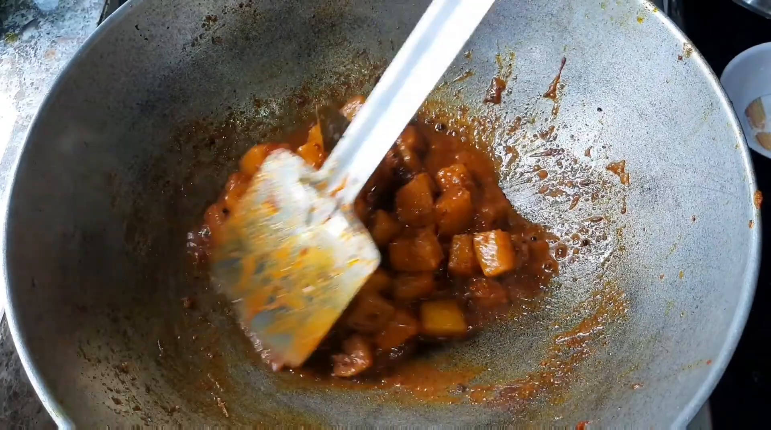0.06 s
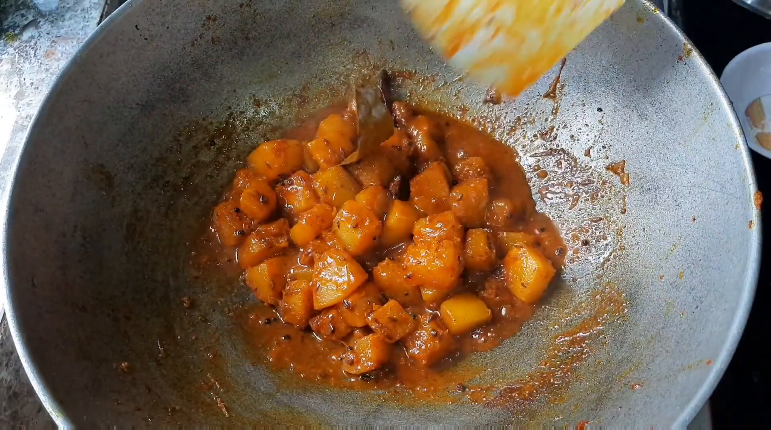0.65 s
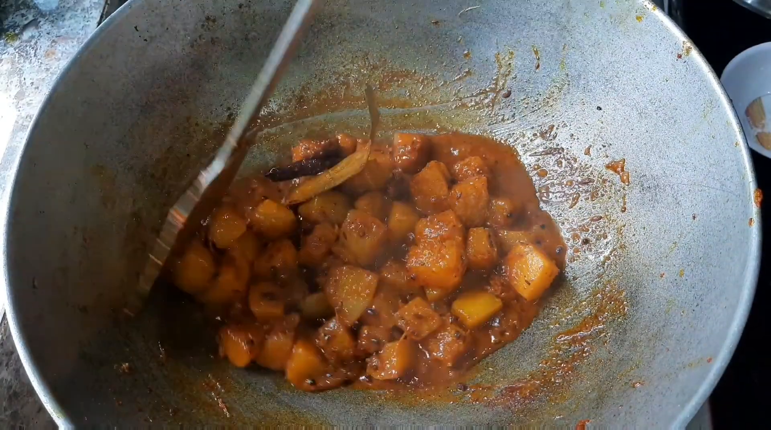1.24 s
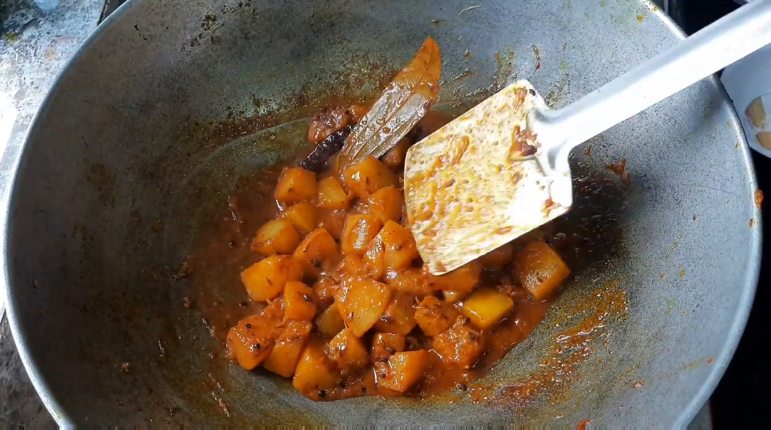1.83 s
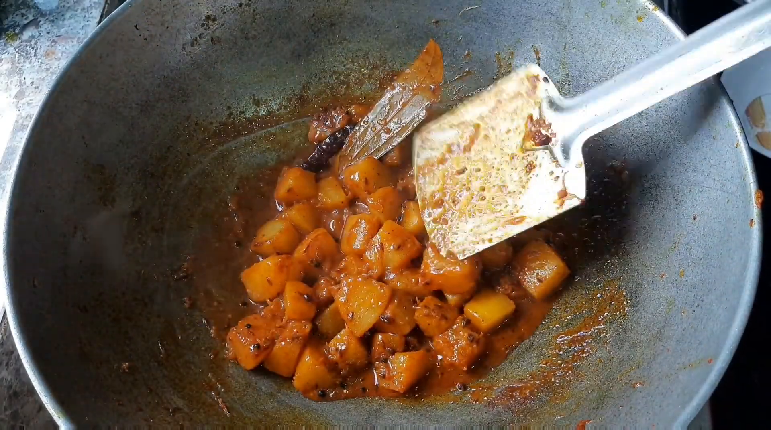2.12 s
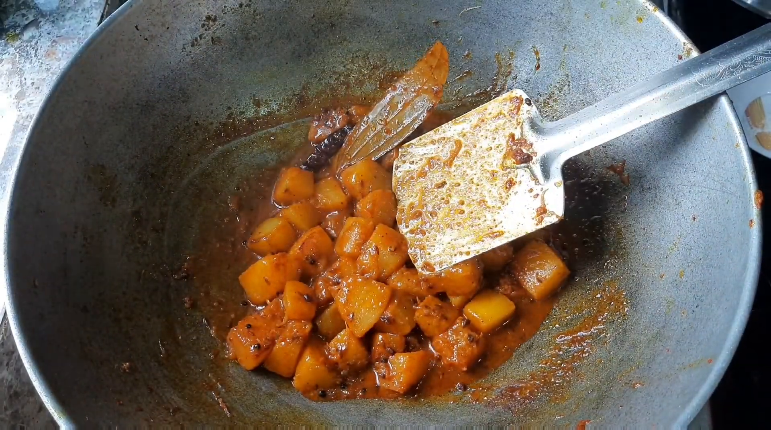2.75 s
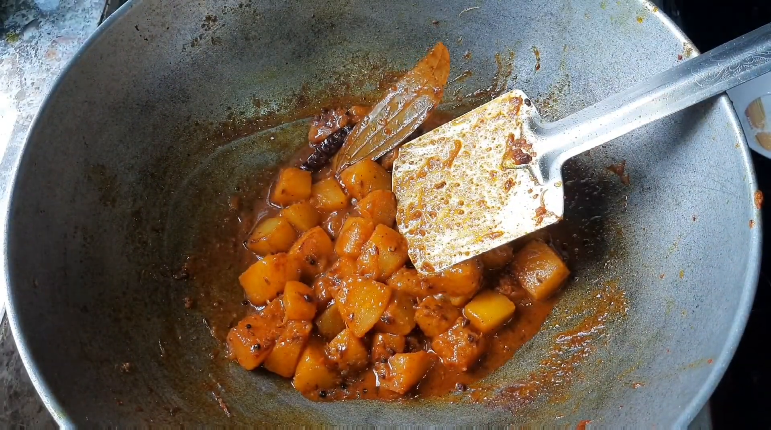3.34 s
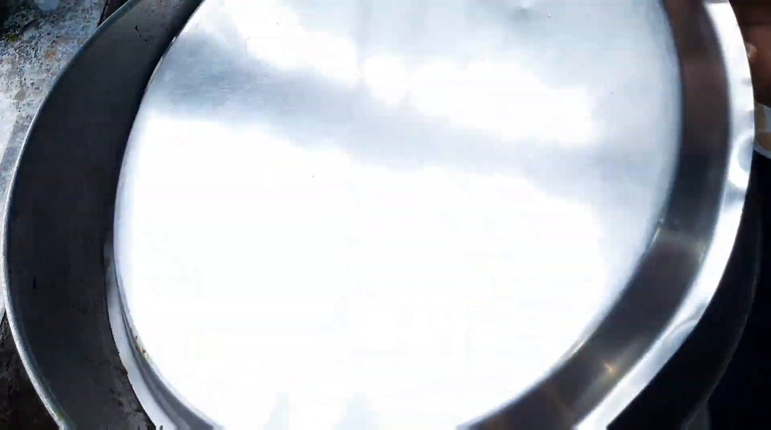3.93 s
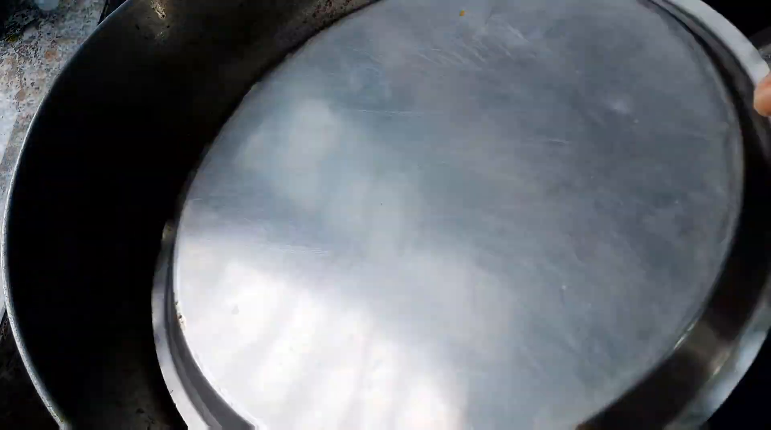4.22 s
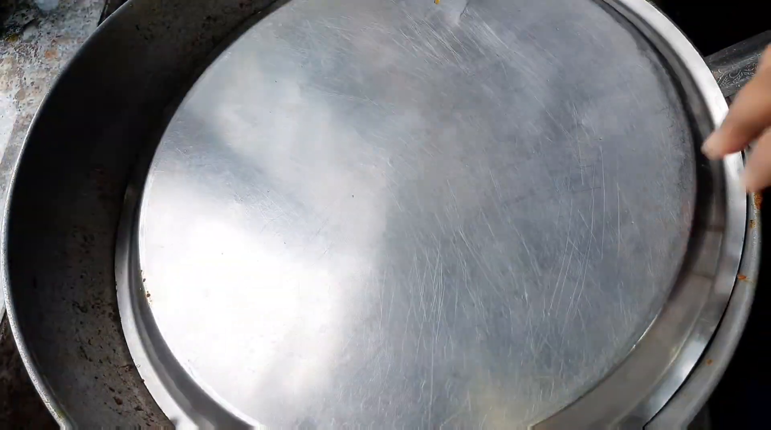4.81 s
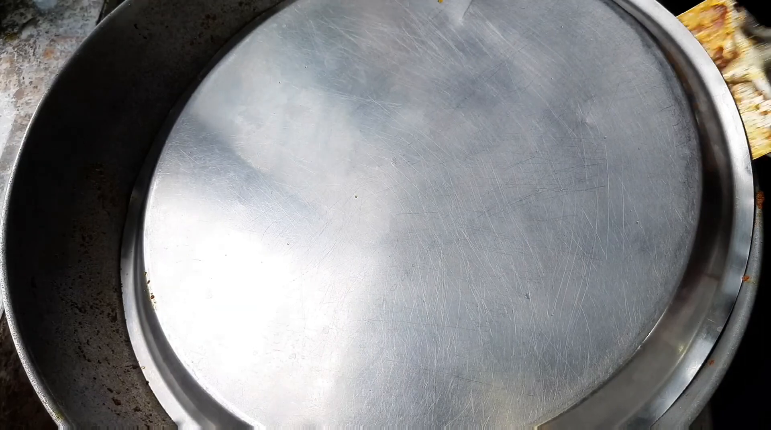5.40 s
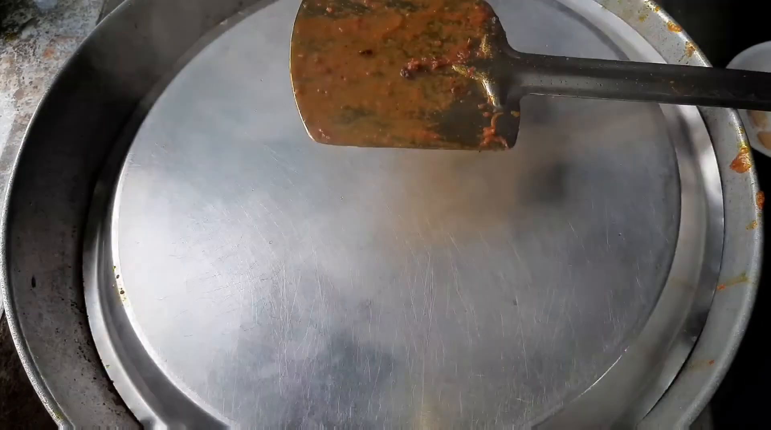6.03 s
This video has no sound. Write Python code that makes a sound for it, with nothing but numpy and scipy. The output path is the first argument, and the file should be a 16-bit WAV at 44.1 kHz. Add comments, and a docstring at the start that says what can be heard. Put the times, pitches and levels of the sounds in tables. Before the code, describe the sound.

Close to a kitchen stove, low gusts of air rumble on the microphone about once a second, over quiet frying and a steel spatula scraping and tapping in a wok. A lid is picked up with light clinks and lands with a ringing metal clatter. At once water flashes to steam, and a loud, high hiss with fine spitting and a faint ring under the lid covers almost everything else.

```python
"""Water from a wet steel lid bursts into a loud hiss on a hot wok, ringing between pan and lid.
The microphone is close to a kitchen stove, and a draught buffets it in slow, even waves.
First, vegetables fry in oil while a steel spatula scrapes, knocks and shoves them through the sauce.
Then the lid is picked up, knocks on the rim and slides into place, and its water runs down the
hot metal and flashes to steam."""
import sys
import numpy as np
from scipy import signal
from scipy.fft import rfft, irfft, next_fast_len
from scipy.io import wavfile
from scipy.ndimage import uniform_filter1d

SR = 44100
rng = np.random.default_rng(int(sys.argv[2]) if len(sys.argv) > 2 else 0)


def file_out(sig):
    """Save sig as 16-bit WAV at sys.argv[1]."""
    # one column per channel
    cols = np.atleast_2d(sig).T
    # limit, then scale
    lim = np.clip(cols, -1, 1)
    pcm = np.round(lim * 32767).astype(np.int16)
    wavfile.write(sys.argv[1], SR, pcm)


N = 267246
T = np.arange(N) / SR

# Spectra as heard from beside the stove. Each row: frequency in Hz, relative level in dB.
ROOM_SPECTRUM = [(30, -12), (60, -2), (120, -2.5), (220, -5.5), (290, 1.5), (500, -4.5), (800, -8.5),
                 (1300, -11), (2500, -25), (3500, -54)]
BUFFET_SPECTRUM = [(25, -21), (45, -6), (80, 4), (180, 0), (250, -6), (330, -11), (400, -18.5),
                   (520, -24.5), (650, -37.5), (900, -43.5), (1400, -56.5)]  # moving air on the microphone
OIL_SPECTRUM = [(710, -38), (1200, -9), (1320, -47), (1540, -11), (2050, -8.5), (2800, -6), (3020, -2),
                (3470, 1), (4540, 0.5), (7600, 3.5), (9830, -4), (12100, -16.5), (15600, -25)]
BLADE_SPECTRUM = [(710, -9), (1200, -8), (1420, -46), (1570, -3.5), (1710, -4), (1940, -11), (2140, -11),
                  (2380, -11), (2890, -10), (3190, -2), (5690, 2.5), (8740, 0.5), (15600, -21)]  # the spatula's grit and clatter
WOK_RUB_SPECTRUM = [(350, 6.5), (550, -2), (750, 0), (920, 0), (1100, -7), (1350, -30), (2500, -33)]
LIFT_SPECTRUM = [(400, -18), (600, 8), (900, -3.5), (2000, -6.5), (3500, -5), (7000, -7), (10000, -29),
                 (15000, -42)]  # clatter of the lid as it is picked up
RIM_SPECTRUM = [(100, -14.5), (250, -5.5), (400, 7.5), (650, -7.5), (800, -11), (1050, -7), (1400, -38),
                (2500, -17.5), (4500, -10), (8000, -18), (15000, -41)]  # clatter of the lid on the pan
STEAM_SPECTRUM = [(2000, -25), (3500, -10.5), (5200, -7.5), (6300, -1.5), (7500, 2.5), (8100, -1),
                  (9300, 1), (11000, -1.5), (13000, -6), (15600, -10)]
SPIT_SPECTRUM = [(60, -42), (300, -18), (700, -15), (1100, -13), (1800, -3.5), (2500, 0), (3200, 1.5),
                 (4500, -0.5), (7000, -2), (14000, -8.5)]  # larger drops of water

# The draught reaches the microphone about every 1.2 s, once with an after-gust.
# Each row: start in seconds, length in seconds, relative level in dB, sag in dB per second.
DRAUGHT_GUSTS = [(-.3, 0.63, -24, 14.5), (0.906, 0.66, -17.5, 37.5), (2.136, 0.54, -24, 10),
                 (2.565, 0.25, -28, 8), (3.308, 0.717, -23, 23), (4.501, 0.65, -32.5, 6.5),
                 (5.67, .7, -35.5, -11.5)]
# The oil flares up where food meets hot metal. Each row: peak in seconds, level in dB, rise in seconds.
OIL_FLARES = [(.08, -51, .09), (1.03, -47, 0.055), (1.36, -82, 0.09), (2.2, -49.5, 0.24),
              (3.52, -61.5, 0.093), (4.08, -53.5, 0.18)]
# Pushes that swell and fade. Each row: peak in seconds, relative level in dB.
VEGETABLE_SHOVES = [(.16, -58), (.5, -52), (.67, -65), (1.09, -55), (2.05, -69), (2.22, -61), (2.32, -61)]
LID_SLIDES = [(4.305, -23.5), (4.55, -48)]  # down the wall of the pan, then a nudge into place

# Resonances of rubbed steel. Each row: frequency in Hz, width in Hz, relative level in dB.
BLADE_RESONANCES = [(1586, 19, -5), (2490, 68, -6), (4330, 57, -1), (5060, 30, 6), (5670, 67, 4),
                    (6130, 40, 5), (6640, 50, 0), (7340, 76, 3), (8410, 40, -2), (9020, 40, -4)]
SLIDE_RESONANCES = [(550, 37, -6), (686, 44, 0.5), (696, 22, -14), (917, 16, -2), (1055, 29, -7),
                    (1440, 61, -9.5), (2040, 25, -5.5), (2534, 62, -5.5)]
# Modes of struck steel. Each row: frequency in Hz, relative level in dB, time to fall 60 dB in seconds.
SPATULA_MODES = [(577, -10.5, 0.11), (723, -12.5, 0.2), (1150, -14, 0.068), (1590, -24, 0.13),
                 (1810, -29, 0.12), (2180, -10, 0.093), (2353, 5, 0.11), (2620, -22, .06), (2820, -5, 0.15),
                 (3280, -18, 0.099), (4370, -10, 0.1), (5440, 11.5, 0.064), (5700, 1, 0.083),
                 (6140, 7, 0.08), (6514, 2, .07), (7100, 4, .07), (7700, 9.5, 0.045), (8350, 2, .07)]
HELD_LID_MODES = [(544, -7.5, 0.19), (634, 2, .18), (664, -18, 0.14), (1130, -0.5, 0.21), (1590, -14, .2),
                  (1660, 0, 0.1), (1714, -1, 0.099), (2130, 4, .1), (2100, -8, 0.44), (2163, 5.5, 0.065),
                  (2610, -12, .1), (3320, -5, 0.12)]
SEATED_LID_MODES = [(329, -0.5, 0.64), (366, -14, 0.17), (431.5, 2, 0.31), (506, -1.5, 0.08),
                    (505, 12, 0.15), (608, -10, 0.13), (654, 3, 0.12), (723, -12, 0.28), (911, -4.5, 0.2),
                    (1010, -10, 0.14), (990, -16, 0.17), (1400, -16, 0.15), (1547, -11, 0.12),
                    (1950, -21, .14), (2040, -23, .14), (2500, -27, .14), (3160, -13, 0.18),
                    (4520, -2, .11), (6300, -12, .09)]
# Blows on the steel. Each row: start in seconds, level in dB, ring against clatter in dB,
# rise in seconds, brightness in dB per octave.
SPATULA_BLOWS = [(.288, -53.5, -4, .002, -3), (.846, -44.5, -5, .002, 1), (.888, -50, 5.5, .001, 4),
                 (1.448, -33.5, 2.5, 0.00072, -2), (2.422, -41, -4, 0.0069, -4)]
LIFT_BLOWS = [(2.855, -45.5, -7, 0.0032, 2), (2.878, -58.5, 16, 0.032, -20.5), (3.031, -47, 1.5, 0.0032, 1),
              (3.074, -47, 6.5, 0.0052, -0.5)]
LANDING_BLOWS = [(3.884, -48, -7, 0.0056, 3), (3.926, -35, -10, 0.006, -0.5),
                 (3.941, -37.5, -1, 0.0021, 4.5), (4.066, -38.5, -20, 0.017, 4),
                 (4.216, -28, -1.5, 0.023, -0.5), (4.261, -20.5, -4.5, 0.00074, -1.5),
                 (4.292, -21.5, -2.5, 0.013, 0.5), (4.336, -22, -4.5, 0.013, -1),
                 (4.572, -44, 18, 0.013, 9), (4.665, -40.5, 2, .015, -13), (5.39, -37, -9, 0.016, -4),
                 (6.035, -36, -4, .012, -3)]

# Tones of the space under the lid. Each row: frequency in Hz, relative level in dB.
CAVITY_TONES = [(1421, -12), (2353, -3.5), (3122, 4), (3695, -4), (4580, -1.5), (5200, 8.5), (6238, 14),
                (6395, 6), (7115, -13), (7490, 6), (7960, -25), (9045, 1), (9457, -5), (10404, -11),
                (12104, -4), (12235, -14), (13467, -8)]
# The course of the hiss's treble. Each row: time in seconds, relative level in dB.
HISS_TREBLE = [(4.42, -20.5), (4.534, -22.5), (4.602, -17.5), (4.904, -19.5), (5.196, -18), (5.95, -18),
               (6.06, -16)]


def amp(db):
    """Decibels to gain."""
    return 10 ** (np.asarray(db) / 20)


def unit_rms(x):
    """Scales to rms 1."""
    return x / np.sqrt(np.mean(x ** 2) + 1e-20)


def tint(x, spectrum, tilt_db=0):
    """Filters x by a spectrum with steep ends, tilted by tilt_db an octave, at rms 1."""
    size = next_fast_len(len(x))
    octave = np.log2(np.fft.rfftfreq(size, 1 / SR) + 1)
    hz, db = np.transpose(spectrum)
    inside = np.clip(octave, np.log2(hz[0]), np.log2(hz[-1]))
    shape_db = np.interp(inside, np.log2(hz), db) + tilt_db * inside - 24 * abs(octave - inside)
    return unit_rms(irfft(rfft(x, size) * amp(shape_db), size)[:len(x)])


def wander(per_s):
    """A smooth random curve of rms 1, changing up to per_s times a second."""
    times = np.arange(0, T[-1] + 1, 0.21 / per_s)
    values = np.convolve(rng.standard_normal(len(times)), [1, 2, 1], "same")
    return unit_rms(np.interp(T, times, values))


def pops(per_s, spread_db):
    """Random clicks at rms 1; a few stand out if spread_db is positive, or fall back if negative."""
    at, chance, sign = rng.random((int(per_s * N / SR), 3)).T
    size = amp(spread_db * np.minimum(-np.log(1 - chance), 5))
    return unit_rms(np.bincount((at * N).astype(int), size * np.sign(sign - .5), N))


def resonate(x, hz, width_hz):
    """One steady resonance, at rms 1."""
    r = np.exp(-np.pi * width_hz / SR)
    return unit_rms(signal.lfilter([1, 0, -1], [1, -2 * r * np.cos(2 * np.pi * hz / SR), r * r], x))


def glide(x, hz, width_hz):
    """A resonance that follows the curve hz, at rms 1."""
    turn = np.exp(2j * np.pi * np.cumsum(hz) / SR)
    return unit_rms((turn * signal.lfilter([1], [1, -np.exp(-np.pi * width_hz / SR)], x / turn)).real)


def echoes(x, t60, wet_db):
    """Adds a dense, dying train of reflections."""
    t = T[:SR // 4]
    tail = rng.standard_normal(len(t)) * amp(-60 * t / t60)
    return x + amp(wet_db) * signal.oaconvolve(x, tail / np.linalg.norm(tail))[:N]


def stroke(start_s, length_s, rise_s, release_s):
    """A push that eases in, holds at 1 if long enough, and eases out."""
    up = np.clip((T - start_s) / rise_s, 0, 1)
    down = np.clip((start_s + length_s - T) / release_s, 0, 1)
    return (np.sin(np.pi / 2 * up) * np.sin(np.pi / 2 * down)) ** 2


def flare(peak_s, rise_s, fade_s):
    """Swells to 1 at peak_s and dies away."""
    t = T - peak_s
    return np.exp(-(np.minimum(t, 0) / rise_s) ** 2 - np.maximum(t, 0) / fade_s)


def room_tone(level_db=-64.5):
    """The kitchen's faint, low noise behind the stove."""
    return amp(level_db) * tint(rng.standard_normal(N), ROOM_SPECTRUM)


def draught(rise_s=0.18, release_s=0.16):
    """Eddies push on the microphone; faster air makes smaller, higher ones."""
    force = np.zeros(N)
    for start, length, db, sag in DRAUGHT_GUSTS:
        force += stroke(start, length, rise_s, release_s) * amp(db - sag * np.clip(T - start, 0, length))
    force += amp(-42) * stroke(4.18, .3, rise_s, release_s)  # the closing lid pushes out a puff of air
    speed = np.clip(force / amp(-28.5), 0, 1) ** 0.86
    eddies = rng.standard_normal(N)
    fast_air = tint(eddies, BUFFET_SPECTRUM, tilt_db=0.73)
    slow_air = tint(eddies, BUFFET_SPECTRUM, tilt_db=-4.5)
    air = speed * fast_air + (1 - speed) * slow_air
    return force * air * amp(-1.6 + 1.25 * wander(35))


def frying(steady_db=-57.5):
    """Countless tiny bubbles burst in the oil, steadily and in flares."""
    heat = amp(steady_db) + sum(amp(db) * flare(s, rise, fade_s=0.17) for s, db, rise in OIL_FLARES)
    return heat * tint(pops(9000, spread_db=-1.5), OIL_SPECTRUM) * amp(wander(36))


def spurt():
    """Steam whistles briefly out of one drop in the oil."""
    whistle = resonate(rng.standard_normal(N), hz=7750, width_hz=920)
    return amp(-36.5) * flare(peak_s=2.112, rise_s=0.0059, fade_s=0.0038) * whistle


def sauce(simmer_db=-75):
    """Small air pockets in the sauce ring for a few cycles as the pieces shift: a soft squish."""
    bubbles = sum(resonate(pops(250, spread_db=2.5), hz, hz / 10) for hz in np.geomspace(1200, 3800, 10))
    shoves = sum(amp(db - 1.5) * flare(s, rise_s=0.038, fade_s=0.038) for s, db in VEGETABLE_SHOVES)
    return (amp(simmer_db) + shoves) * unit_rms(bubbles)


def rubbed_steel(slips, resonances):
    """Each slip rings the resonances of the steel; at rms 1."""
    return unit_rms(sum(amp(db) * resonate(slips, hz, width) for hz, width, db in resonances))


def knocks(blows, modes, spectrum, pivot_hz, clatter_t60):
    """Each blow rings the modes over a short clatter; its brightness tilts the modes about pivot_hz."""
    t, out = T[:SR * 2 // 5], np.zeros(N)
    hz, mode_db, mode_t60 = np.transpose(modes)[:, :, None]
    for start, db, ring_db, rise, bright_db in blows:
        weight = amp(mode_db + bright_db * np.log2(hz / pivot_hz))
        swing = np.sin(2 * np.pi * (hz * t + rng.random(hz.shape))) * amp(-60 * t / mode_t60)
        ring = 2 * (weight * swing).sum(0) / np.linalg.norm(weight)
        dragged_t60 = clatter_t60 + 13.6 * rise  # a slow contact drags on
        decay = amp(-60 * np.maximum(t - rise, 0) / dragged_t60)
        clatter = tint(rng.standard_normal(len(t)), spectrum, bright_db) * decay
        knock = amp(db) * np.minimum(t / rise, 1) * (amp(ring_db) * ring + clatter)
        span = out[round(start * SR):][:len(t)]
        span += knock[:len(span)]
    return out


def spatula(chatter_hz=1840, pressed_rise_hz=140, rub_lag_s=0.079):
    """The blade knocks in the pan and makes one stick-slip stroke, chattering higher under pressure."""
    pressure = stroke(start_s=0.868, length_s=0.32, rise_s=0.15, release_s=0.13)
    slips = pops(2000, spread_db=2.4) * pressure * amp(2.2 * wander(60))
    grit = tint(echoes(slips, t60=0.035, wet_db=8), BLADE_SPECTRUM)
    ring = rubbed_steel(slips, BLADE_RESONANCES)
    edge_hz = (chatter_hz + pressed_rise_hz * pressure) * (1 + 0.018 * wander(40))
    chatter = glide(slips, edge_hz, width_hz=50)
    scrape = np.std(slips) * (amp(-44) * grit + amp(-42.5) * ring + amp(-55) * chatter)
    climb = np.interp(T - rub_lag_s, T, pressure)  # the wok rubs dully as the blade climbs its wall
    rub = amp(-46) * climb * tint(pops(2500, spread_db=0.5), WOK_RUB_SPECTRUM)
    taps = knocks(SPATULA_BLOWS, SPATULA_MODES, BLADE_SPECTRUM, pivot_hz=4000, clatter_t60=0.19)
    return scrape + rub + taps


def lid():
    """The lid rings in the hand, lands on the pan, and keeps ringing as its rim judders down the wall."""
    lift = knocks(LIFT_BLOWS, HELD_LID_MODES, LIFT_SPECTRUM, pivot_hz=1200, clatter_t60=.25)
    landing = knocks(LANDING_BLOWS, SEATED_LID_MODES, RIM_SPECTRUM, pivot_hz=600, clatter_t60=0.071)
    judder = rubbed_steel(pops(3000, spread_db=1.5), SLIDE_RESONANCES)
    sliding = sum(amp(db) * flare(s, rise_s=0.025, fade_s=0.096) for s, db in LID_SLIDES)
    return lift + landing + sliding * judder


def spitting(steady_db=-22.5, surge_db=-27):
    """Larger drops of water spit on the metal, most of all while the lid closes."""
    drops = echoes(pops(7000, spread_db=2.1), t60=.12, wet_db=-4)
    spit = tint(drops, SPIT_SPECTRUM) * amp(1.2 * wander(30))
    return spit * (amp(steady_db) + amp(surge_db) * flare(peak_s=4.56, rise_s=0.14, fade_s=.05))


def cavity(waver_db=4):
    """Steam jets ring the space under the lid in tones that waver in level."""
    jets = rng.standard_normal(N)
    tones = (resonate(jets, hz, width_hz=30) * amp(db + waver_db * wander(4)) for hz, db in CAVITY_TONES)
    return unit_rms(sum(tones))


def shimmer(hiss, treble_db, patchy_db=1.23, hump_db=2.0):
    """Patches of the hiss swell and fade, a broad hump follows its pitch, the top follows treble_db."""
    steam_hz, hump_width_hz, sink_start_s, sink_hz_per_s = 9300, 1000, 5.13, 1500
    hz, t, bands = signal.stft(hiss, SR, nperseg=512)
    patches = uniform_filter1d(rng.standard_normal(bands.shape), size=10, axis=0)
    patches = unit_rms(uniform_filter1d(patches, size=16, axis=1))
    pitch = steam_hz - sink_hz_per_s * np.maximum(t - sink_start_s, 0)  # sinks as the drops spread
    hump = np.exp(-((hz[:, None] - pitch) / hump_width_hz) ** 2)
    top_db = np.clip((hz - 10000) / 2500, 0, 1)[:, None] * np.interp(t, T, treble_db)
    gain = amp(patchy_db * patches + hump_db * (hump - 1) + top_db)
    return signal.istft(bands * gain, SR, nperseg=512)[1][:N]


def boiling(water_s=4.2125, spread_s=0.19, growth_db_per_s=182, settle_s=0.78):
    """Water flashes to steam on the hot metal: the hiss grows as it spreads, overshoots and settles."""
    since_spread = T - water_s - spread_s
    growth_db = growth_db_per_s * np.clip(since_spread, -spread_s, 0)
    wetted = np.clip((T - water_s) / 0.0087, 0, 1) * amp(growth_db)
    overshoot_db = 2 * np.exp(-np.maximum(since_spread, 0) / settle_s)
    treble_db = np.interp(T, *np.transpose(HISS_TREBLE))
    treble_db = treble_db - treble_db.mean() + 2 + .35 * growth_db  # lags while the water spreads
    bursts = pops(40000, spread_db=.8)
    flutter_hz = 47.13 + 1.48 * wander(7.5)
    flutter_db = 1.02 * np.sin(2 * np.pi * np.cumsum(flutter_hz) / SR)
    steam = tint(echoes(bursts, t60=.09, wet_db=-11), STEAM_SPECTRUM)
    hiss = shimmer(steam + amp(-13.5) * cavity(), treble_db)
    hiss *= amp(-11.5 + overshoot_db + .5 * wander(30) + flutter_db)
    return wetted * (hiss + spitting())


def scene():
    """One microphone at the stove, alike on both channels, with a little kitchen echo on the steel."""
    steel = echoes(spatula() + lid(), t60=.18, wet_db=-12)
    mono = steel + frying() + spurt() + sauce() + boiling() + draught() + room_tone()
    return np.array([mono, mono])


def record(dry):
    """The loudest peaks are rounded off, then the highest treble is cut."""
    ceiling, cutoff_hz = amp(-3), 15750
    rounded = dry / (1 + (dry / ceiling) ** 8) ** (1 / 8)
    lowpass = signal.firwin(511, cutoff_hz, window=("kaiser", 9), fs=SR)
    return signal.oaconvolve(rounded, lowpass[None], "same")


dry = scene()
out = record(dry)
file_out(out)
```